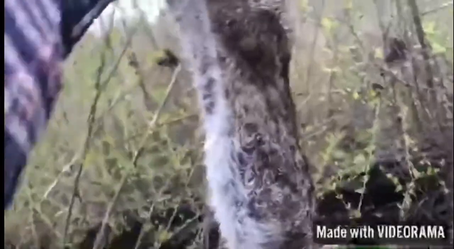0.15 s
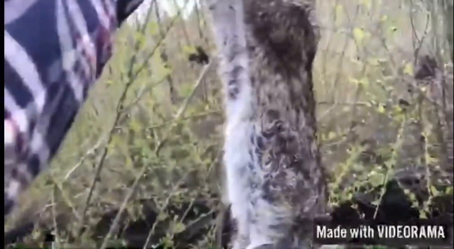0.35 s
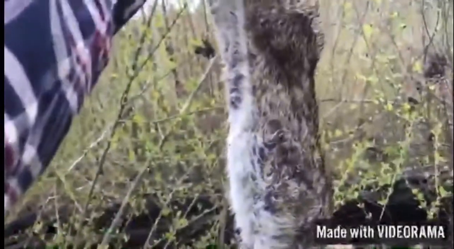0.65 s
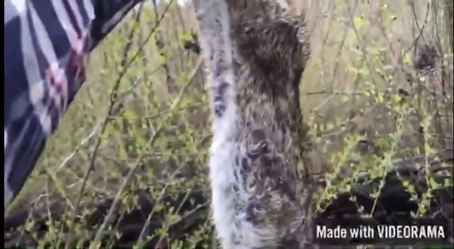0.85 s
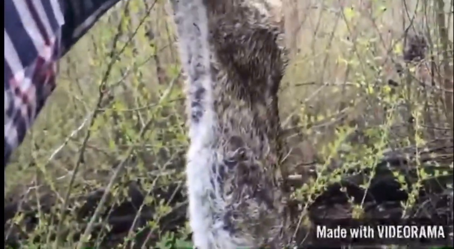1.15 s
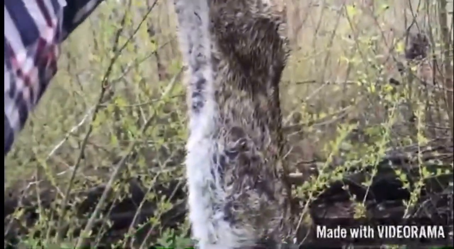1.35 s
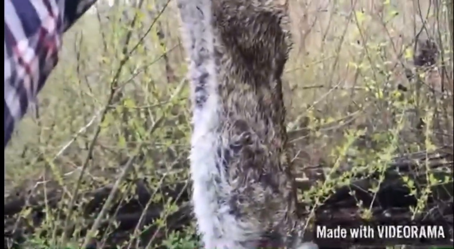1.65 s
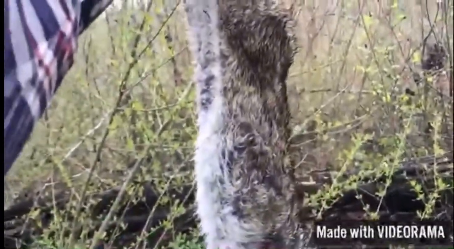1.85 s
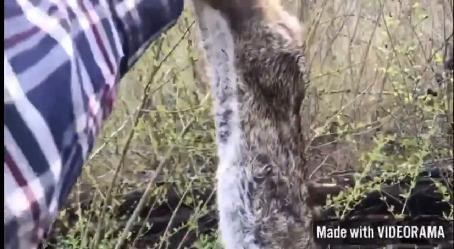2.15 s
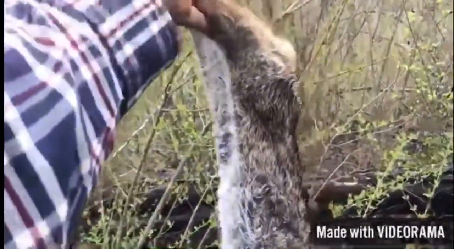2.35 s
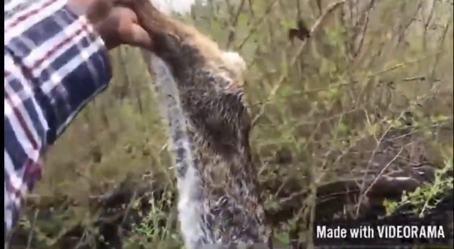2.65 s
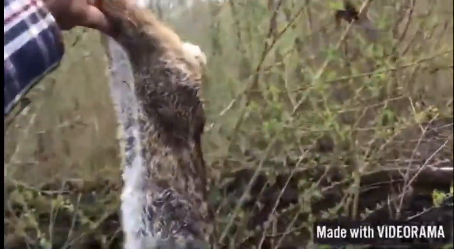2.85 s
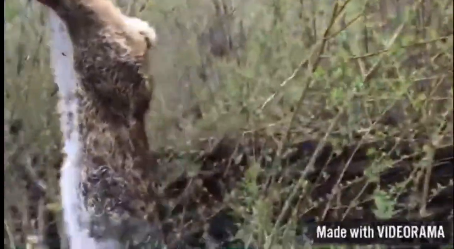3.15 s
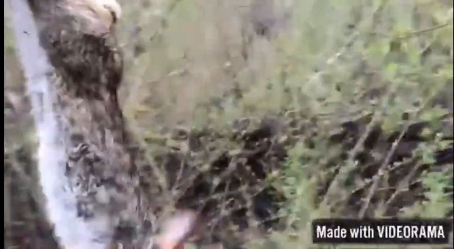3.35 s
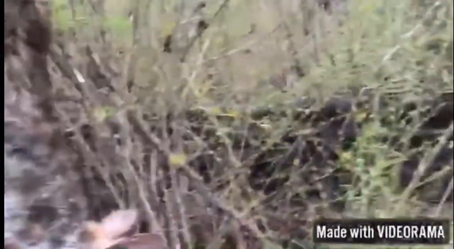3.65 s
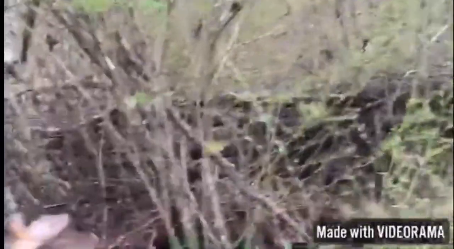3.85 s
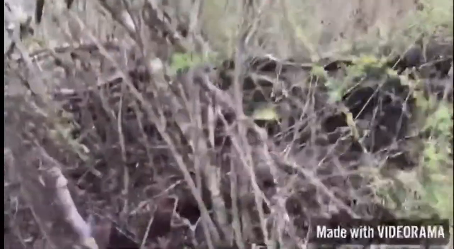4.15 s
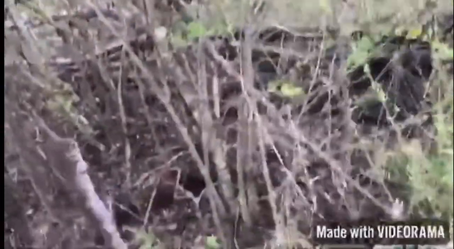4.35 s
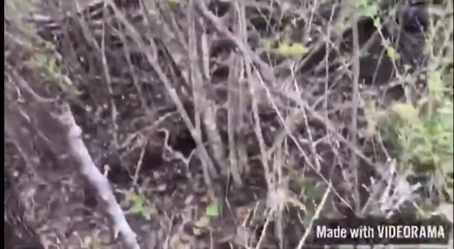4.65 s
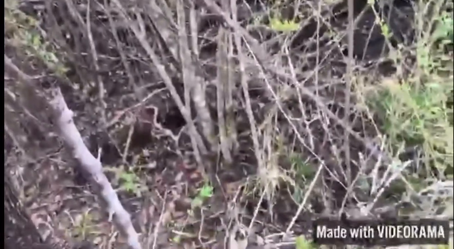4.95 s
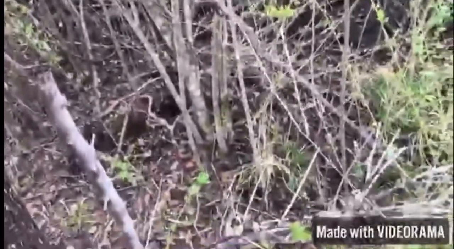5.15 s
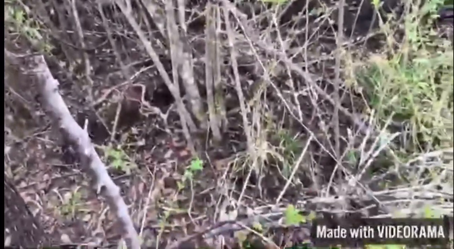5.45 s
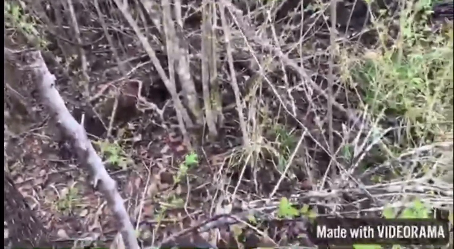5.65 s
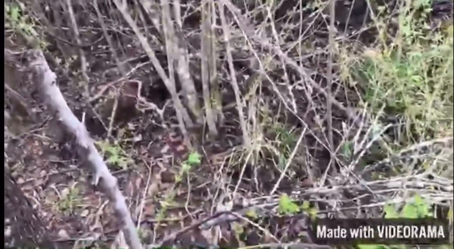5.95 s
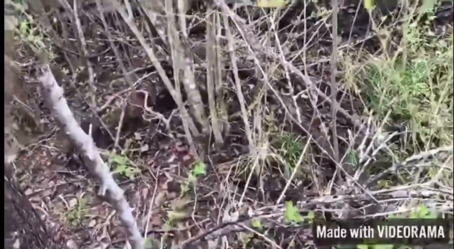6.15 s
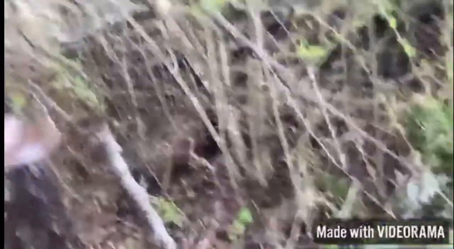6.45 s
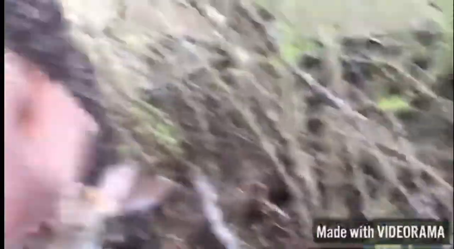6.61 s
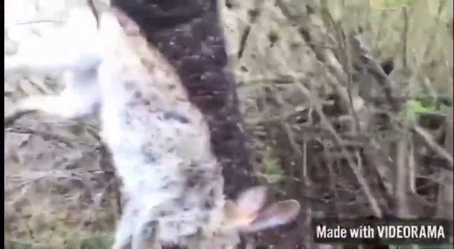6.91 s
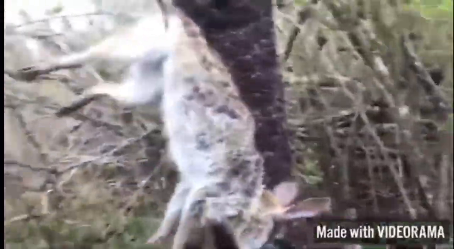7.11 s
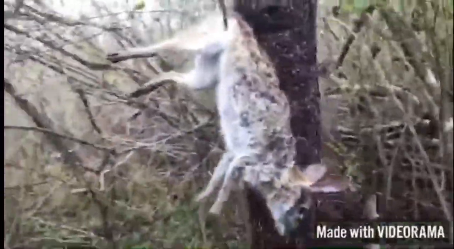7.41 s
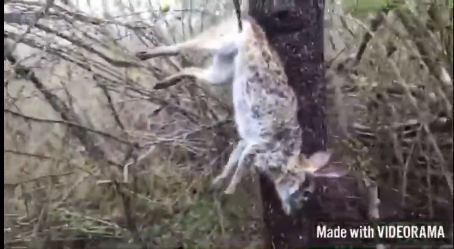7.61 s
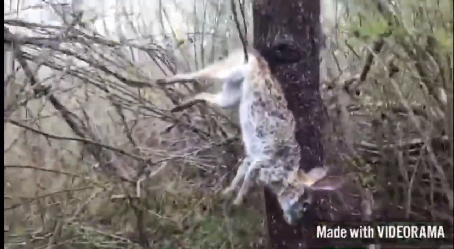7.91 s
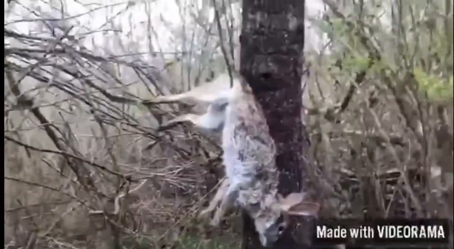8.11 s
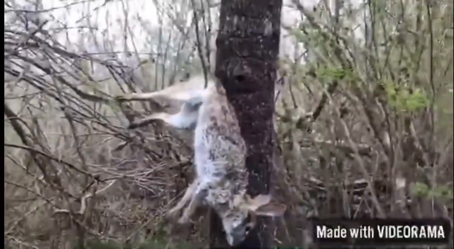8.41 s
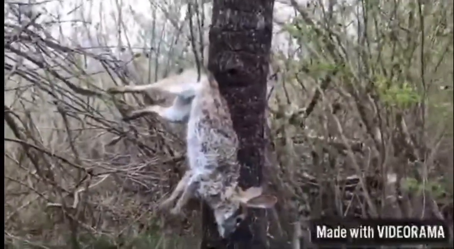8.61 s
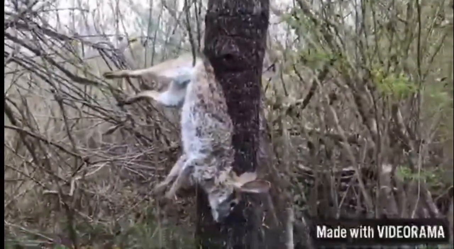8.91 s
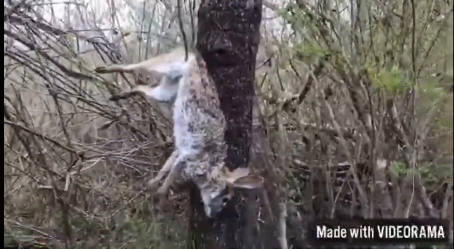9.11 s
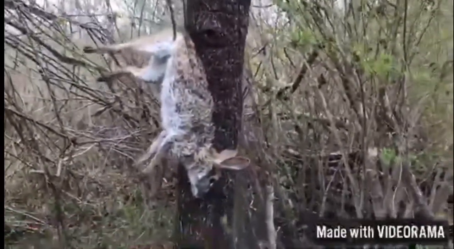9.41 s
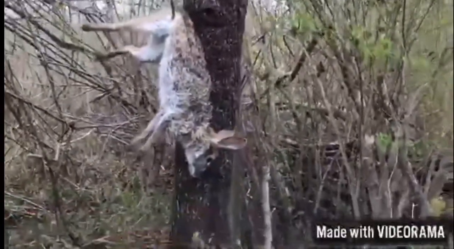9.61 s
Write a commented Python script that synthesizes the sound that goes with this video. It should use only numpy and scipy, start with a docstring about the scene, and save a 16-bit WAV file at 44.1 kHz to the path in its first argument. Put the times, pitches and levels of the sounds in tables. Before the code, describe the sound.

High nasal whines and clipped yelps come in fits from hounds moving through brush close to a hand-held phone. Sniffs, sharp twig snaps and rustling dry leaves fall between the calls. After a short lull the yelping and whining return, then give way to paws stirring the leaves. Behind it all lie soft outdoor air and a faint, far rumble, with a few dull scuffs of cloth.

```python
"""Thin whistling whines and short throaty yelps: hounds fret around a hung-up hare in a spring thicket,
a metre or two from a hand-held phone. They whistle through the nose, yelp with vocal folds and throat,
and snuffle at the scent in puffs that flap the muzzle. Twigs snap and dry leaves crackle under
their paws, a sleeve rubs, and a low rumble hangs in the distance."""
import sys
import numpy as np
from scipy import signal
from scipy.fft import rfft, irfft, next_fast_len
from scipy.io import wavfile
from scipy.ndimage import uniform_filter1d, map_coordinates

SR = 44100
rng = np.random.default_rng(int(sys.argv[2]) if len(sys.argv) > 2 else 0)


def master_out(mix):
    """Clip the mix to full scale and print it as 16-bit PCM to the path in sys.argv[1]."""
    frames = np.transpose(np.atleast_2d(mix))
    ceiling = np.clip(frames, -1, 1)
    pcm = np.round(ceiling * 32767).astype(np.int16)
    wavfile.write(sys.argv[1], SR, pcm)


N = 430857
T = np.arange(N) / SR
TOP_HZ = 8700

# How much the undergrowth stirs. Each row: time in seconds, relative level in dB.
UNDERGROWTH_STIR = [(0, -49.5), (.9, -48), (1.4, -55), (1.85, -51), (2.35, -44.5), (2.65, -54.5),
                    (3.3, -47), (4.3, -47), (4.6, -54.5), (5.2, -55.5), (6.2, -48), (6.6, -46), (6.82, -53),
                    (7.45, -44.5), (8.0, -49.5), (8.45, -48.5), (8.83, -55.5), (9.15, -53.5), (9.77, -55.5)]


def undb(db):
    """Decibels to gain."""
    return 10 ** (np.asarray(db) / 20)


def unit(x):
    """Scale to rms 1."""
    return x / np.sqrt(np.mean(x ** 2) + 1e-20)


def shape(x, response):
    """Filter by a gain given as a function of frequency."""
    n = next_fast_len(len(x))
    return irfft(rfft(x, n) * response(np.arange(n // 2 + 1) * SR / n + 1), n)[:len(x)]


def colour(x, points):
    """EQ x along a curve of (Hz, dB) points, at rms 1."""
    hz, db = np.transpose(points)
    return unit(shape(x, lambda f: undb(np.interp(np.log(f), np.log(hz), db))))


def resonances(hz, modes, order=2):
    """Gain of (Hz, width in Hz, dB) resonances at a frequency; a higher order has steeper sides."""
    return sum(undb(db) / (1 + ((hz / f - f / hz) * f / width) ** order) for f, width, db in modes)


def wander(n, rate):
    """Smooth random drift of spread near 1, renewed rate times a second."""
    hold = max(2, int(SR / rate))
    points = rng.standard_normal(n // hold + 2)
    drift = np.interp(np.arange(n) / hold, np.arange(len(points)), points)
    return uniform_filter1d(drift, hold // 2) * np.sqrt(2)


def patchy(x, depth_db, rate=22, per_octave=3.536):
    """Let neighbouring bands of x swell and fade on their own, about rate times a second."""
    hz, t, bands = signal.stft(x, SR, nperseg=512)
    place = np.array(np.broadcast_arrays(per_octave * np.log2(1 + hz / hz[2])[:, None], rate * t))
    drift = map_coordinates(rng.standard_normal((64, 512)), place, order=1, mode="mirror")
    return signal.istft(bands * undb(depth_db * drift), SR)[1][:len(x)]


def gate(n, rise, fall):
    """Smooth opening and closing over rise and fall seconds."""
    t = np.arange(n) / SR
    return np.sin(np.pi / 2 * np.clip(np.minimum(t / rise, t[::-1] / fall), 0, 1))


def effort(n, crest, swell_db, fade_db):
    """Gain of a call: it swells, holds around its crest, then fades."""
    away = np.interp(np.linspace(0, 1, n), [0, np.clip(crest, .02, .98), 1], [-1, 0, 1])
    return undb(-np.where(away < 0, swell_db, fade_db) * away ** 2)


def arch(n, start_hz, middle_hz, end_hz):
    """A pitch glide bent into one smooth arch or dip."""
    u = np.linspace(0, 1, n)
    return start_hz + (end_hz - start_hz) * u + (2 * middle_hz - start_hz - end_hz) * 2 * u * (1 - u)


def add(out, start, x):
    """Mix x in at start seconds."""
    i = int(np.clip(start * SR, 0, N - 1))
    out[i:i + len(x)] += x[:N - i]


def woodland_air(air_db=-52, follow=0.72, split_hz=400, rumble_hz=73):
    """Soft open air whose upper range ebbs and swells with the stirring brush, and a far rumble."""
    # Tone of the open air. Each row: frequency in Hz, relative level in dB.
    air_eq = [(25, -22), (48, -2.5), (70, -7.5), (110, -5.5), (230, -10.5), (450, -10), (780, -13.5),
              (1300, -15.5), (2700, -20.5), (4200, -21.5), (8500, -27)]
    stir_db = np.interp(T, *np.transpose(UNDERGROWTH_STIR))
    air = colour(rng.standard_normal(N), air_eq) * undb(air_db)
    bass = shape(air, lambda f: 1 / (1 + (f / split_hz) ** 2))
    brush = patchy(air - bass, depth_db=5.5) * undb(follow * (stir_db - stir_db.mean()))
    rumble = unit(shape(rng.standard_normal(N), lambda f: 1 / (1 + ((f - rumble_hz) / 6) ** 2)))
    rumble_db = np.interp(T, [1.8, 2.4], [-62, -57])
    return bass + brush + rumble * undb(rumble_db)


def leaf_crackle(clicks_per_s=150, uneven_db=6, flicker_db=0.5, t60=0.024, trim_db=-8):
    """Dry leaves give tiny clicks of very uneven size, in fits and starts as the dogs move about."""
    size = undb(uneven_db * np.minimum(rng.exponential(size=N), 3.2))
    clicks = (rng.random(N) < clicks_per_s / SR) * size * undb(flicker_db * wander(N, 14))
    grains = signal.fftconvolve(clicks, undb(-60 * T[:SR // 20] / t60))[:N] * rng.standard_normal(N)
    crackle = colour(grains, [(150, -21.5), (500, -7.5), (1300, -3), (3500, -3.5), (8500, -9.5)])
    stir_db = np.interp(T, *np.transpose(UNDERGROWTH_STIR))
    return unit(patchy(crackle, depth_db=6)) * undb(stir_db + trim_db)


def whines(step_hz=214, quaver=0.0023, waver_db=4.5, slip_db=6, breath_db=-17):
    """A nose whistle and its octave in a halo of air; each wavers, and both falter as the pitch slips."""
    # Each row: start and length in seconds, start, middle and end of the glide in Hz,
    # crest as a share of the length, level of the whistle and of its octave in dB.
    calls = [ (0.18, 0.038, 4820, 4070, 3850, 0.18, -52.5, -80),
             (0.759, 0.097, 5200, 4694, 4500, 0.51, -45.5, -53),
             (0.997, 0.282, 4770, 5016, 5590, 0.76, -39.5, -75),
             (1.09, .1, 4450, 4303, 4000, 0.17, -44.5, -50),
             (1.548, 0.04, 4200, 3660, 2930, 0.95, -66, -48),
             (1.752, 0.14, 4290, 4455, 4830, 0.22, -45, -84),
             (2.102, 0.066, 4100, 4145, 3950, 0.47, -53, -42),
             (2.176, 0.04, 4220, 4200, 3730, 0.22, -65, -41),
             (2.582, 0.12, 4900, 4836, 5020, 0.17, -52.5, -76),
             (2.701, 0.11, 5120, 4960, 4700, 0.4, -45.5, -73),
             (4.701, 0.19, 5200, 4960, 4250, 0.35, -62, -78),
             (4.862, 0.13, 4520, 3500, 4220, 0.39, -64, -52.5),
             (4.986, 0.13, 4100, 4410, 3470, 0.34, -54, -71),
             (5.266, 0.13, 4540, 4335, 3510, 0.8, -47.5, -62),
             (5.958, 0.03, 4054, 3675, 3640, 0.41, -35.5, -41),
             (6.852, 0.089, 3820, 4357, 3390, 0.48, -39, -42.5),
             (6.953, 0.035, 3550, 3530, 3620, 0.37, -52, -40.5),
             (7.435, 0.031, 3560, 3500, 3550, .5, -61, -39.5),
             (8.38, 0.14, 4470, 4610, 4390, 0.31, -45.5, -69),
             (8.502, 0.094, 4520, 3650, 3400, 0.24, -48.5, -39),
             (8.63, 0.048, 4410, 4220, 4490, 0.81, -34.5, -40)]
    out = np.zeros(N)
    for start, length, start_hz, middle_hz, end_hz, crest, db, octave_db in calls:
        n = int(length * SR)
        # the whistle clings to a pitch, then slips on to the next in a small step
        step = 2 * np.pi * arch(n, start_hz, middle_hz, end_hz) / step_hz
        hz = step_hz * (step - np.sin(step)) / (2 * np.pi)
        phase = 2 * np.pi * np.cumsum(hz * (1 + quaver * wander(n, 180))) / SR
        # a weakly blown whistle barely holds and breaks up most
        depth_db = waver_db * np.interp(max(db, octave_db), [-52, -40], [1.7, .8])
        whistle = np.zeros(n)
        for k, partial_db in (1, db), (2, octave_db):
            falter = unit(undb(slip_db * np.cos(step) / 2 + depth_db * np.minimum(wander(n, 68), 1)))
            halo = undb(breath_db) * (wander(n, 840) + 1j * wander(n, 840))
            tone = np.imag((np.sqrt(2) + k * halo) * np.exp(1j * k * phase))
            whistle += undb(partial_db) * falter * tone
        add(out, start, whistle * effort(n, crest, swell_db=11, fade_db=12) * gate(n, .006, .006))
    return out


def sleeve_rubs(catch_db=6):
    """Cloth near the phone catches and slips in dull, uneven scuffs."""
    # Each row: start and length in seconds, level in dB.
    rubs = [(0.187, 0.11, -52), (4.508, 0.54, -57), (8.911, 0.426, -49)]
    out = np.zeros(N)
    for start, length, db in rubs:
        n = int(length * SR)
        friction = rng.standard_normal(n) * undb(catch_db * wander(n, 47.44))
        scuff = colour(friction, [(40, -8), (130, 5.5), (340, 10.5), (520, -20), (1500, -20.5)])
        add(out, start, scuff * undb(db) * gate(n, .0071, .04))
    return out


def twig_snaps(crack_db=-7, splinter_db=-19, splinter_t60=0.25, trim_db=1):
    """A break or a paw's knock rings the wood, thin twigs with most crack; fibres and leaves settle."""
    # Each row: start in seconds, peak before the trim in dB, pitch of the wood in Hz.
    twigs = [ (0.288, -35, 1010), (0.685, -25.5, 560), (.875, -31, 3000), (0.952, -29.5, 690),
             (1.276, -29, 600), (1.65, -30, 239), (2.154, -16, 6760), (2.426, -40, 4200),
             (2.813, -26.5, 6150), (3.068, -27, 4170), (3.388, -25, 2680), (3.789, -28, 740),
             (4.221, -24, 4800), (4.894, -35, 6500), (6.209, -32.5, 2200), (6.94, -30.5, 330),
             (7.398, -30, 3000), (7.463, -30, 236), (8.157, -37, 3000), (8.197, -19.5, 3600),
             (9.125, -33, 545), (9.245, -25, 730), (9.455, -31.5, 3100), (9.467, -30, 2580),
             (9.67, -27, 3800)]
    out, t = np.zeros(N), T[:SR // 6]
    for start, db, hz in twigs:
        ring_t60 = .023 * (1500 / hz) ** .25  # thin twigs ring shortest
        decay = undb(-60 * t / ring_t60) + undb(splinter_db - 60 * t / splinter_t60)
        burst = rng.standard_normal(len(t)) * decay
        wood_band = [hz / 2.4, min(hz * 1.81, TOP_HZ)]
        wood = signal.lfilter(*signal.butter(2, wood_band, "band", fs=SR), burst)
        crack = signal.lfilter(*signal.butter(2, [500, TOP_HZ], "band", fs=SR), burst)
        snap = unit(wood) + undb(crack_db) * min(hz / 3000, 1) * unit(crack)
        add(out, start, snap / np.abs(snap).max() * undb(db + trim_db))
    return out


def yelps(jitter=0.088, shimmer=0.15, flicker_db=4, closing_octaves=0.077, droop_s=0.004):
    """Vocal folds drive throat and mouth; in rough yelps the cycles vary and air rasps once a cycle."""
    # Each row: start and length in seconds, start and end of the glide in Hz, crest as a share of the
    # length, level in dB, mouth resonance in Hz, treble tilt in dB per octave, roughness from 0 to 1.
    calls = [ (0.439, 0.041, 638, 615, 0.11, -28.5, 835, -5.5, 0.34),
             (0.485, 0.079, 1340, 1165, 0.91, -41.5, 1200, -16, 0.22),
             (0.56, 0.053, 1117, 996, 0.38, -33.5, 1140, 5, 0),
             (1.577, 0.037, 557, 580, 0.69, -29.5, 1010, -7, 0.36),
             (1.9447, 0.055, 474, 607, 0.72, -20, 1187, 1.5, 0.29),
             (2.252, 0.066, 655, 493, 0.17, -39, 745, -31, 0.65),
             (2.452, 0.078, 1410, 2056, 0.14, -48, 1760, -6, 0.65),
             (3.001, 0.045, 567, 612, 0.44, -31.5, 1220, -15, 0.1),
             (3.874, 0.027, 380.6, 387, 0.14, -35, 1130, -7, 0.17),
             (5.328, 0.071, 1073, 934, 0.65, -57, 980, -2, 0.5),
             (5.396, 0.036, 850, 848, 0.53, -40.5, 840, 5.5, 0.67),
             (5.923, 0.032, 412, 445, 0.51, -29, 1270, -8.5, 0.15),
             (6.336, 0.028, 208.8, 200, 0.25, -27.5, 1029, -3.5, 0.31),
             (6.355, 0.029, 1040, 985, 0.54, -25, 970, -6, 0.32),
             (6.437, 0.087, 913, 889, .25, -31.5, 1140, -0.5, 0),
             (6.897, 0.037, 638, 564, 0.47, -41.5, 890, -9, 0.44),
             (7.285, 0.051, 440.4, 529, .08, -30.5, 1140, -1, 0.24),
             (7.328, 0.071, 746, 770, 0.091, -35, 854, 4, 0.06),
             (7.406, 0.032, 740, 730, 0.26, -36, 2230, -7.5, 0.18)]
    # Resonances of the throat. Each row: centre and width in Hz, gain in dB.
    throat = [(560, 380, 0), (2230, 800, -17), (4000, 2000, -35)]
    out = np.zeros(N)
    for start, length, start_hz, end_hz, crest, db, mouth_hz, tilt_db, rough in calls:
        n = int(length * SR)

        def mouth(opening):
            """The mouth's resonance (Hz, width in Hz, dB) sinks as it closes."""
            return [(mouth_hz * 2 ** (closing_octaves * opening), 480, 4)]

        def tract(f, opening=0):
            """Gain of throat and mouth; closing dulls the treble."""
            treble = undb((tilt_db + 5 * opening) * np.log2(np.maximum(f / 700, 1)))
            return (resonances(f, throat) + resonances(f, mouth(opening), order=4)) * treble

        # the pitch drops as the folds let go
        droop = .074 * min(4 * rough, 1) * np.exp(-T[:n][::-1] / droop_s)
        hz = np.linspace(start_hz, end_hz, n) * (1 - droop)
        phase = 2 * np.pi * np.cumsum(hz * (1 + jitter * rough * wander(n, 500))) / SR
        k = np.arange(1, int(TOP_HZ / hz.mean()) + 1)[:, None]
        partial_hz = k * hz
        # the folds close a little differently each time, so high overtones blur and flicker most
        height = partial_hz / 2500
        blur = (.28 + 1.2 * rough) * np.minimum(height ** 2, 3) * np.array([wander(n, 350) for _ in k])
        flicker = undb(flicker_db * np.minimum(height, 1) * np.array([wander(n, 130) for _ in k]))
        opening = np.linspace(.5, -.5, n)  # the mouth closes through the call
        lag = sum(2 * np.arctan((partial_hz / f - f / partial_hz) * f / width)
                  for f, width, _ in throat + mouth(opening))
        gains = tract(partial_hz, opening) * flicker
        partials = gains * np.cos(k * phase + blur - lag)
        voice = unit(partials.sum(axis=0) / np.linalg.norm(gains, axis=0))
        rasp = unit(shape(rng.standard_normal(n) * (1 + np.cos(phase)), tract))
        call = unit(voice * (1 + shimmer * rough * wander(n, 400)) + rough * rasp)
        envelope = effort(n, crest, swell_db=7, fade_db=4.5) * gate(n, .004, .007)
        add(out, start, call * undb(db) * envelope)
    return out


def snuffles(flap_db=2.5, flare_octaves=0.04, flicker_db=1.5):
    """Swelling puffs of air flap the muzzle and ring the nostrils, whose resonances slide as they flare."""
    # Each row: start and length in seconds, muzzle flutter and nostril hiss in dB,
    # the puff's own ring in Hz, rise of the resonances in octaves.
    puffs = [ (0.629, 0.2, -38.5, -51, 740, 0.078), (1.186, 0.043, -38, -57, 1100, -0.15),
             (1.215, 0.12, -39, -39.5, 3420, 0.16), (1.462, 0.18, -44.5, -55.5, 943, -0.041),
             (1.618, .125, -41, -41, 3600, .26), (2.181, 0.13, -45.5, -49, 3060, -0.28),
             (2.314, 0.19, -50.5, -57, 4020, 0.2), (2.999, 0.067, -72, -44.5, 4930, -0.024),
             (5.587, 0.14, -44, -44, 3530, 0.07), (5.905, .18, -51.5, -37, 3680, 0.077),
             (6.922, 0.094, -46, -48, 4270, -0.053), (7.002, 0.06, -44, -36, 2970, 0.0047),
             (7.157, 0.18, -51.5, -50.5, 2281, 0), (7.436, 0.044, -42, -44, 2600, 0),
             (8.057, 0.16, -62, -46, 4680, .05), (8.63, 0.12, -72, -43.5, 2400, -.18),
             (8.906, 0.13, -54.5, -47, 2200, .15), (9.69, 0.069, -54, -47, 1500, .1)]
    # Tone of the fluttering muzzle. Each row: frequency in Hz, relative level in dB.
    muzzle_eq = [(60, -28), (150, -8), (300, -13), (520, -6), (850, -7.5), (1300, -13), (3000, -23),
                 (8500, -27.5)]
    # Resonances of the nose. Each row: centre and width in Hz, gain in dB.
    nostrils = [(1000, 220, -4), (1450, 210, 2), (1900, 260, -4), (2600, 300, 0), (3550, 420, -4),
                (4300, 460, -6), (5900, 850, -8), (8200, 1800, -14)]
    out = np.zeros(N)
    for start, length, flutter_db, hiss_db, ring_hz, rise in puffs:
        n = int(length * SR)
        flutter = colour(rng.standard_normal(n) * undb(flap_db * wander(n, 150)), muzzle_eq)
        modes = nostrils + [(ring_hz, .18 * ring_hz, 1)]
        nose = lambda f: np.sqrt(sum(resonances(f, [mode]) ** 2 for mode in modes))
        ringing = shape(rng.standard_normal(2 * n), nose)
        slide = 2 ** (rise * np.linspace(-.5, .5, n) + flare_octaves * wander(n, 25))
        hiss = unit(map_coordinates(ringing, [np.cumsum(slide)], mode="mirror"))
        puff = undb(flutter_db) * flutter + undb(hiss_db + flicker_db * wander(n, 79.3)) * hiss
        add(out, start, puff * gate(n, .55 * length, .35 * length))
    return out


def paw_rustles(clicks_per_s=900, uneven_db=8, t60=0.014):
    """A paw sweeps through dry leaves: a short, dense spray of clicks, each sweep with its own colour."""
    # Each row: start and length in seconds, level in dB, centre of the band in Hz.
    sweeps = [(0.87, 0.043, -47.5, 4200), (1.92, 0.031, -44, 1500), (4.422, 0.045, -45, 1700),
              (4.669, 0.023, -52, 1980), (4.767, 0.021, -48.5, 1800), (5.909, .022, -46, 2500),
              (7.562, 0.031, -46, 3500), (9.209, 0.14, -45, 3000), (9.445, 0.038, -47.5, 5000),
              (9.497, 0.065, -50.5, 2000), (9.623, 0.089, -48.5, 4800)]
    out = np.zeros(N)
    for start, length, db, hz in sweeps:
        n = int(length * SR)
        hits = rng.random(n) < clicks_per_s / SR
        clicks = hits * undb(uneven_db * np.minimum(rng.exponential(size=n), 3))
        grains = signal.fftconvolve(clicks, undb(-60 * T[:n] / t60))[:n] * rng.standard_normal(n)
        spray = unit(shape(grains, lambda f: np.sqrt(resonances(f, [(hz, .79 * hz, 0)]))))
        add(out, start, spray * undb(db) * gate(n, .3 * length, .3 * length))
    return out


def thicket_echo(x, wet_db=-21, t60=0.18, predelay_s=0.004):
    """Trunks and ground scatter a faint, short echo."""
    t = T[:SR // 2]
    scatter = colour(rng.standard_normal(len(t)), [(100, -5), (700, -4.5), (2500, 2), (8000, -17)])
    tail = scatter * undb(-60 * t / t60) * (t > predelay_s)
    return x + undb(wet_db) * signal.fftconvolve(x, tail / np.linalg.norm(tail))[:N]


def scene():
    """Dogs and twigs echo among the trees, over leaves, sleeve and open air, in mono."""
    dogs = yelps() + whines() + snuffles() + twig_snaps() + paw_rustles()
    return (thicket_echo(dogs) + leaf_crackle() + sleeve_rubs() + woodland_air())[None]


def record(dry):
    """The phone cuts the top end steeply."""
    return signal.sosfilt(signal.ellip(12, .2, 70, TOP_HZ, fs=SR, output="sos"), dry)


dry = scene()
out = record(dry)
master_out(out)
```